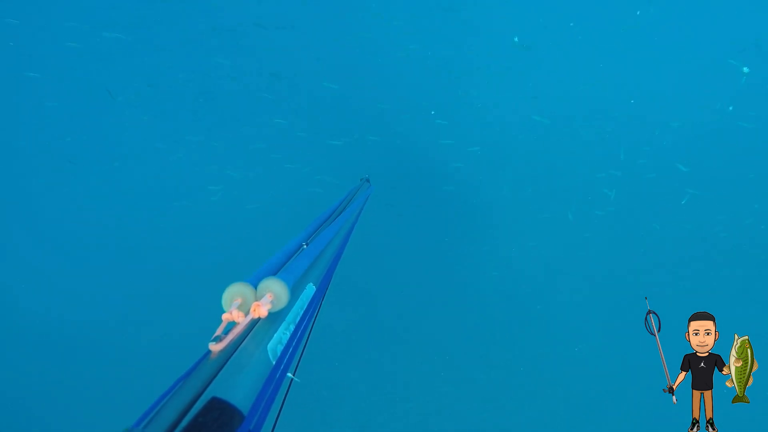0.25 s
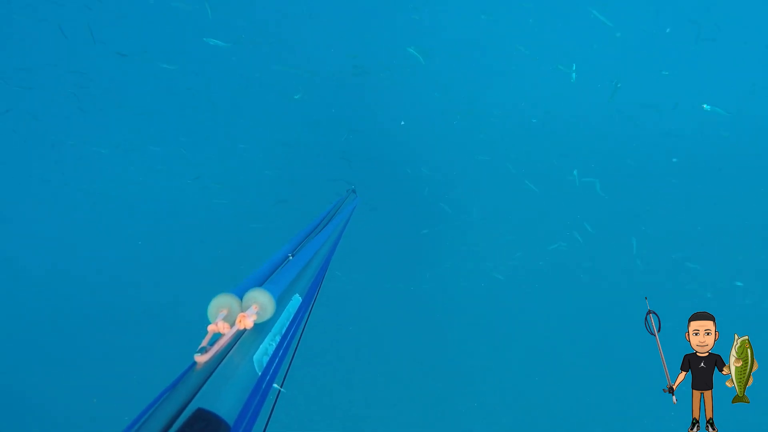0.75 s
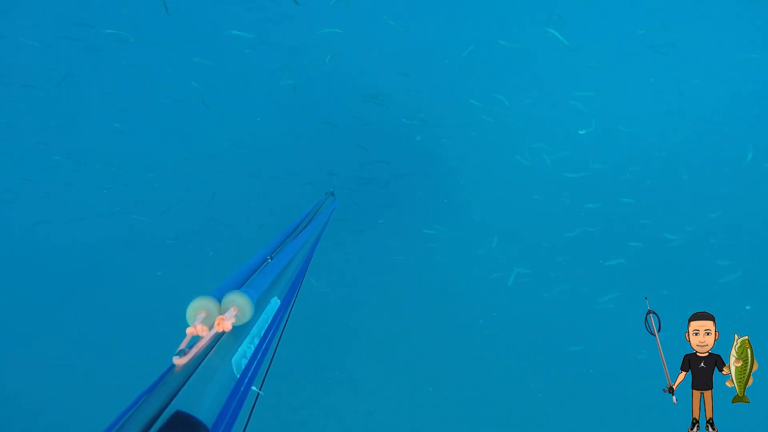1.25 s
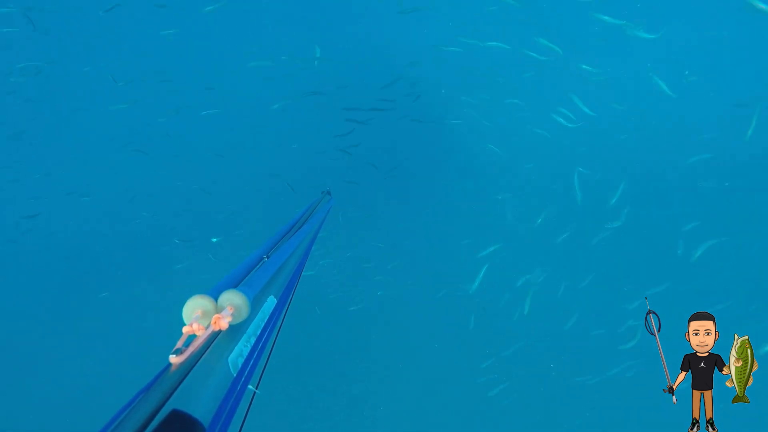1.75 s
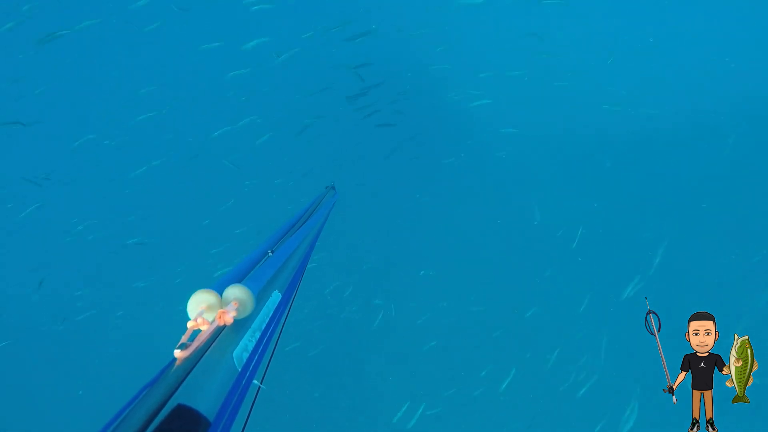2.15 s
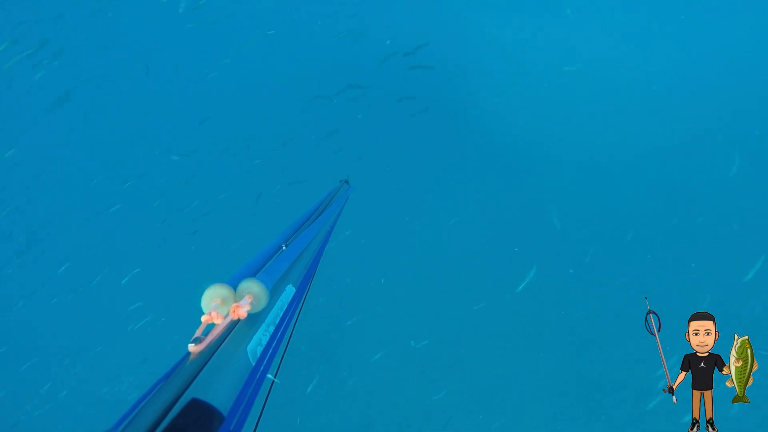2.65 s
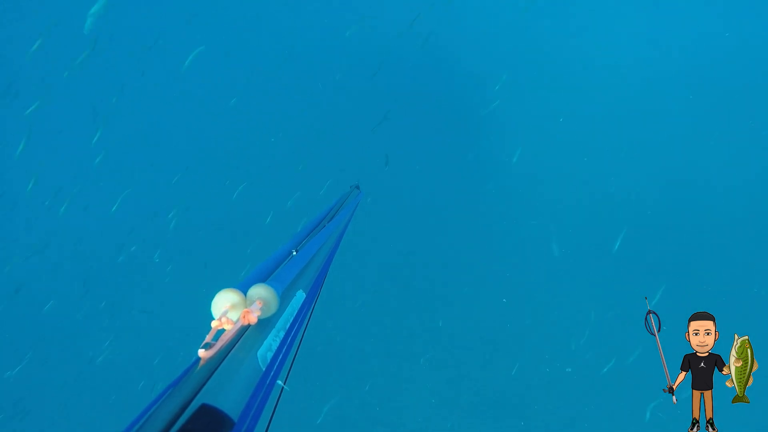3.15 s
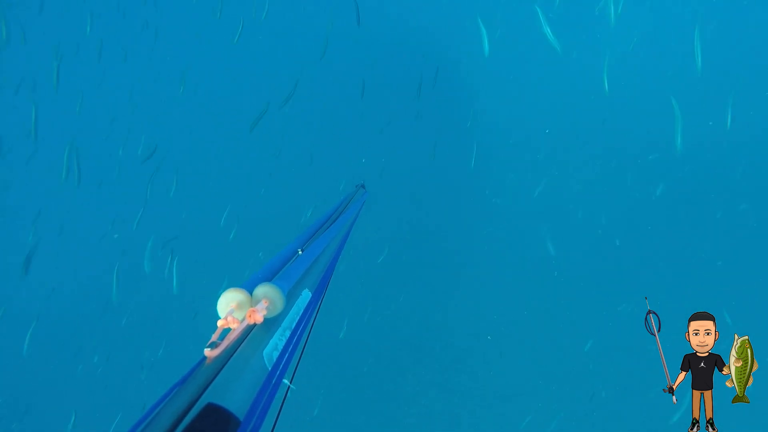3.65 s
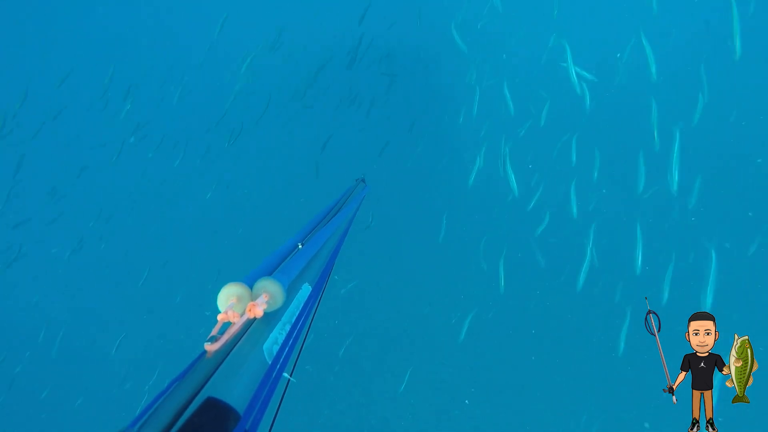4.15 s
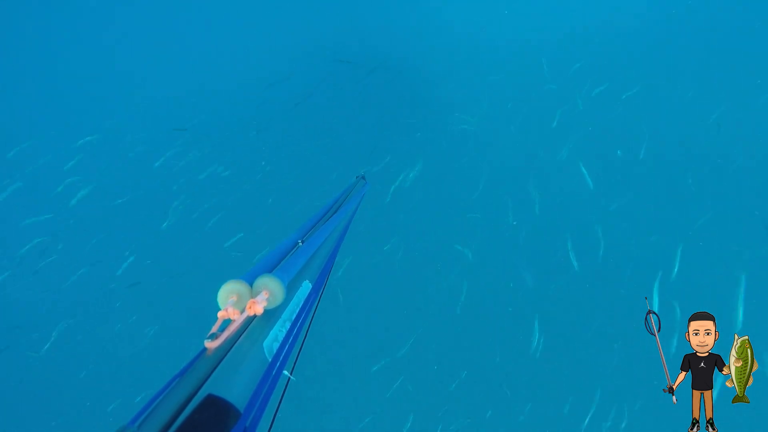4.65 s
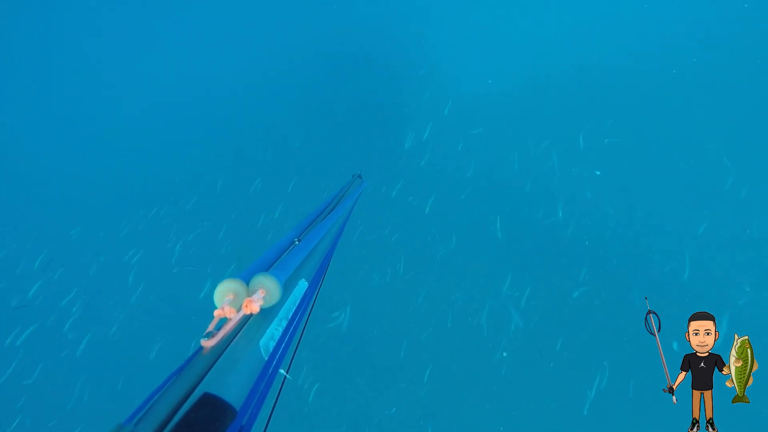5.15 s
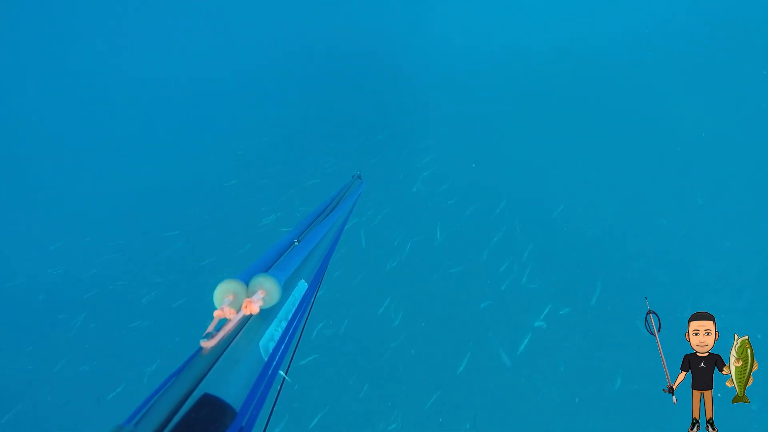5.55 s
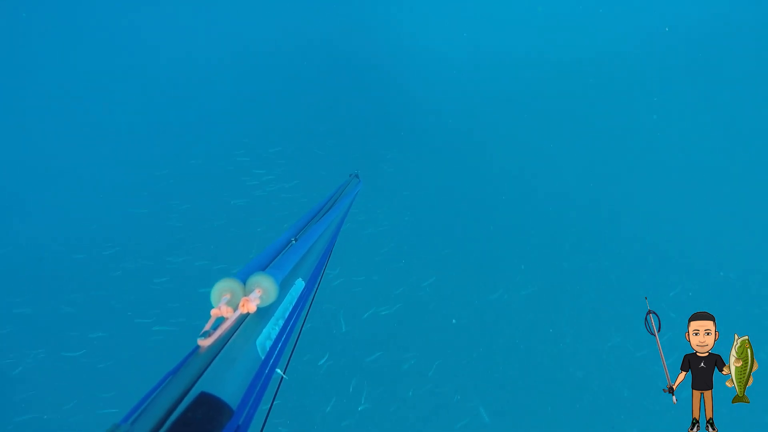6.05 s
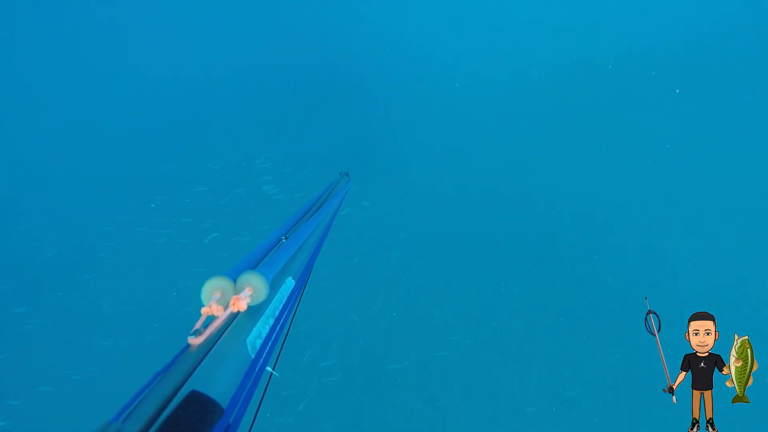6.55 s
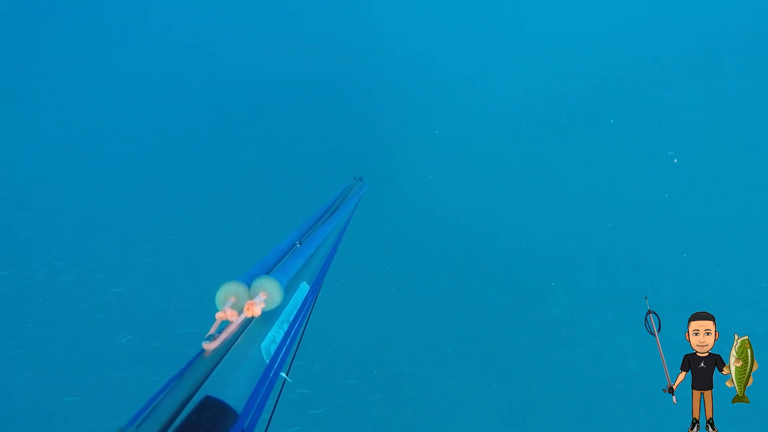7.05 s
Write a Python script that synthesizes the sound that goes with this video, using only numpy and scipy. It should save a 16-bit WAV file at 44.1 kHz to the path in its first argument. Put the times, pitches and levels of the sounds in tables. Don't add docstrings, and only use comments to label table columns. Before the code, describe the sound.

Underwater, a motorboat's low throbbing drone and metallic rattle grow steadily louder, with early housing knocks, faint shrimp clicks and bubbles at the end.

```python
import sys
import numpy as np
from scipy import signal
from scipy.fft import rfft, irfft
from scipy.io import wavfile
from scipy.ndimage import uniform_filter1d

SR = 44100
rng = np.random.default_rng(int(sys.argv[2]) if len(sys.argv) > 2 else 0)


def invert_db(x):
    u = np.asarray(x, float) / 20
    return 10 ** u


def file_out(sig):
    cols = np.atleast_2d(sig).T
    lim = np.clip(cols, -1, 1)
    pcm = np.round(lim * 32767).astype(np.int16)
    wavfile.write(sys.argv[1], SR, pcm)


N = 321489


def curves(table):
    s, *columns = np.transpose(table)
    return [np.interp(np.arange(N) / SR, s, c) for c in columns]


def unit(x):
    return x / np.sqrt(np.mean(x ** 2))


def delayed(x, lag_ms):
    return np.interp(np.arange(N) - lag_ms * SR / 1000, np.arange(N), x)


def walk(rate_hz):
    hold = int(SR / rate_hz)
    steps = np.repeat(rng.standard_normal(N // hold + 1), hold)
    return 1.42 * uniform_filter1d(uniform_filter1d(steps, hold), hold)[:N]


def ring(x, hz, width_hz):
    decay = np.exp(-np.pi * width_hz / SR)
    return signal.lfilter([1 - decay], [1, -decay * np.exp(2j * np.pi * hz / SR)], x)


# t/s, heading/-1..1
HOUSING_HEADING = [(0, .6), (.3, 1), (.8, .9), (1.2, 0.2), (1.7, 0.068), (2.2, 0.18), (2.9, -.3),
                   (3.4, -0.28), (3.9, 0.74), (4.3, .8), (4.8, .7), (5.2, -0.1), (5.6, -0.49), (6.1, -0.22),
                   (6.5, -0.49), (6.9, -.1), (7.29, .2)]


def housing(x, panels, facing_db=None):
    out = np.zeros((2, N))
    for k, (hz, width_hz, left_db, right_db, lead_rad) in enumerate(panels):
        z = ring(ring(x, hz, 1.6 * width_hz), hz, 1.6 * width_hz)
        if facing_db is not None:
            z = z * invert_db(facing_db[k] * curves(HOUSING_HEADING)[0])
        out += [invert_db(left_db) * z.real, invert_db(right_db) * (z * np.exp(1j * lead_rad)).real]
    return out


def churn(centres_hz, width_hz):
    z = rng.standard_normal(N)
    for hz in centres_hz:
        z = ring(z, hz, width_hz)
    return unit(z.real)


# t/s, rate/Hz
ENGINE_CYCLE = [(0.0, 14.761), (0.5, 13.363), (0.9, 13.91), (1.4, 13.725), (1.9, 13.111), (2.3, 13.277),
                (2.65, 13.059), (3.05, 14.021), (3.4, 13.379), (3.8, 13.567), (4.3, 12.556), (4.8, 12.174),
                (5.15, 11.528), (5.45, 12.947), (5.75, 13.533), (6.05, 13.533), (6.5, 13.754),
                (7.29, 14.278)]
# t/s, exhaust level/dB, hull rattle level/dB
BOAT_LEVELS = [(0.0, -34.5, -44), (0.38, -35.5, -41.5), (0.43, -39.5, -44), (0.45, -36, -44),
               (0.79, -41, -43), (0.91, -32.5, -43), (1.7, -35.5, -38.5), (1.76, -33, -38),
               (3.39, -27, -41.5), (4.1, -28.5, -44.5), (4.85, -24.5, -44), (4.95, -28, -44),
               (5.14, -22.5, -44.5), (5.2, -25, -43), (5.79, -20, -38), (6.21, -27.5, -38),
               (6.42, -25, -36.5), (7.29, -23, -40.5)]
# multiple, level/dB
MAIN_MULTIPLES = [(7, -3), (8, -3), (9, -2.5), (10, -4)]
# multiple, level re boom/dB, unsteadiness/dB
LOW_MULTIPLES = [(5, -20, 2), (6, -19, 2)]
# multiple, level re overtones/dB, unsteadiness/dB
HIGH_MULTIPLES = [(11, -10.5, 3), (12, -1, 1.5), (13, -10, 3), (14, -15, 3), (15, -22, 3), (16, -16, 2)]
# t/s, note/Hz
EXHAUST_NOTE_HZ = [(0, 107), (1.4, 110), (2.3, 109), (2.8, 115), (3.3, 112), (3.9, 104.3), (4.5, 105.8),
                   (4.8, 100), (5.1, 107.6), (5.27, 120), (5.45, 100.5), (5.62, 106.3), (5.8, 119.6),
                   (6.0, 107), (6.22, 118.5), (6.4, 111), (6.9, 111), (7.29, 112)]
# t/s, throb position/cycles, overtone level/dB, evenness/0..1
EXHAUST_FLOW = [(0, -0.2, -1.5, .2), (1.3, -.15, -3.5, 0.12), (1.5, -0.4, 1, 0.2), (2.1, -0.9, -1, 0.22),
                (2.5, -0.76, -1.5, .05), (3.7, -1.43, 2, .05), (4.1, -1.55, 1.8, 0.66),
                (4.7, -1.7, -2.5, .7), (5.1, -2, 1, .7), (5.3, -1.4, -0.5, 0.5), (5.7, -1.16, -2, .8),
                (6.1, -1.4, 0.5, 0.3), (6.5, -1.27, 0, 0.1), (6.7, -1.2, 1, .05), (6.9, -1.87, 0, .05),
                (7.1, -2, -3, 0.4), (7.29, -2.5, 1, 0.1)]


def boom(turns):
    width_hz, beating_db, upper_re_boom_db, left_lag_ms = 32.5, 3.5, -14, 0.24
    body_db, rate_hz = curves(BOAT_LEVELS)[0], curves(ENGINE_CYCLE)[0]
    throb, open_db, steady = curves(EXHAUST_FLOW)
    upper_db = body_db + upper_re_boom_db + open_db
    note_hz = curves(EXHAUST_NOTE_HZ)[0]

    share_db = []
    for k, db in MAIN_MULTIPLES:
        off_note = 2 * (k * rate_hz - note_hz) / (width_hz * (1 - 0.49 * steady))
        share_db.append(db - 20 * np.log10(1 + off_note ** 2) + beating_db * walk(5))
    total_db = 10 * np.log10(sum(invert_db(2 * db) for db in share_db))
    levels = [(k, body_db + db - total_db) for (k, _), db in zip(MAIN_MULTIPLES, share_db)]
    levels += [(k, body_db + db + loose_db * walk(3.1)) for k, db, loose_db in LOW_MULTIPLES]
    levels += [(k, upper_db + db + loose_db * walk(3.8)) for k, db, loose_db in HIGH_MULTIPLES]

    out = invert_db(body_db - 11.0) * churn((111.3, 111.3, 111.3), 49)
    out += invert_db(upper_db - 7.0) * churn((170, 170, 158), 120)
    drift = 0.65 * walk(2.304)
    for k, db in levels:
        phase = 0.27 * walk(2.3) + 0.36 * walk(11) + drift
        phase += 2 * np.pi * throb * ((k + 2) % 4 - 2)
        phase += steady * np.pi / 2 * (k % 2)
        level = np.sqrt(2) * invert_db(db + 0.87 * walk(12))
        out = out + level * np.sin(2 * np.pi * k * turns + phase)
    return np.array([delayed(out, left_lag_ms), out]) * invert_db(np.array([[-.45], [.45]]))


# t/s, cylinder 1 level/dB, 2 level/dB, 3 level/dB, 4 level/dB
CYLINDER_LEVELS = [(0, -4, -6, -5, -6), (.7, -3, -6, -3, -6), (1.1, 0, -6, -1, -4), (1.7, 0, -5, 1, -5),
                   (2.15, -0.5, -4, 1.5, -8), (2.4, 2, -2.5, 0, -9), (3.0, 1, -2, 0, -7),
                   (3.5, 2, -2, -1, -7), (4.0, 0, -5, -1, -6), (4.5, 0, -3, -1, -6), (5.0, -2, -6, -2, -4),
                   (5.6, -2, -5, -2, -3.5), (6.0, 0.5, -9, 0.5, -3.5), (6.4, 2, -9, 0, -3),
                   (6.75, 0.5, -7, 1, -4), (7.0, 2, -4, -2, -3), (7.29, 0, -6, 1, -4)]


def firings(turns):
    first_firing_turns, decay_s = .425, .0115
    count = (4 * (turns - first_firing_turns) + 4).astype(int)
    fired = np.diff(count, prepend=count[0] - 1)
    since = np.arange(N) - np.flatnonzero(fired)[count - count[0]]
    moods_db = np.array([db + .8 * walk(4) for db in curves(CYLINDER_LEVELS)])
    mood_db = moods_db[count % 4, np.arange(N) - since]
    size = invert_db(.85 * mood_db + 1.3 * rng.standard_normal(N // 100)[count])
    patterns = rng.standard_normal((4, 4, SR // 10))[:, count % 4, since]
    blend = np.array([walk(1.5) for _ in range(4)])
    repeating = np.sum(patterns * blend, axis=0) / np.sqrt(np.sum(blend ** 2, axis=0))
    clatter = .85 * repeating + .5 * rng.standard_normal(N)
    return size * (2.4 * fired + np.exp(-since / (decay_s * SR)) * clatter), count


# t/s, near (surface) lag/ms, far (sea-bed) lag/ms
ECHO_LAGS = [(0, 0.48, 1.26), (1.0, 0.21, 1.53), (1.4, 0.35, 1.73), (1.8, 0.29, 1.79), (2.3, 0.3, 1.78),
             (2.9, 0.3, 1.61), (3.4, 0.35, 1.99), (3.9, 0.66, 2.28), (4.4, 0.54, 1.9), (4.8, 0.55, 2),
             (5.1, 0.38, 1.48), (5.4, 0.52, 1.1), (5.8, 0.33, 1.034), (6.3, 0.26, 1.054),
             (6.7, 0.23, 0.702), (7.03, 0.34, 0.64), (7.15, 0.56, 0.654), (7.29, 0.3, 0.54)]


def surface_and_bed_echoes(burst, wash):
    near_ms, far_ms = curves(ECHO_LAGS)
    for lag_ms, share in ((near_ms, 0.16), (far_ms, 0.36 / far_ms)):
        rippled_ms = lag_ms * (1 + 0.05 * walk(2.6))
        burst = burst - share * delayed(burst, rippled_ms)
        wash = wash - share * delayed(wash, rippled_ms)
    return burst, wash


# f/Hz, width/Hz, left level/dB, right level/dB, right lead/rad
BROADSIDE_PANEL = [(1950, 42, -7, .3, -2.1)]


def singing(burst, wash):
    centre_s, half_s, level_db = 6.77, .33, -7.5
    broadside = np.exp(-((np.arange(N) / SR - centre_s) / half_s) ** 4)
    return invert_db(level_db) * broadside * unit(housing(burst + .3 * wash, BROADSIDE_PANEL))


# f/Hz, width/Hz, left level/dB, right level/dB, right lead/rad
HULL_PANELS = [
    [(487, 47, -17.5, -0.5, 1.48), (540, 126, -7, -3.5, 1.5), (695, 39, -7, -2.5, 2.88),
     (753, 147, -4.5, 5.5, 2.84), (904, 42, -13, -11.5, 3.2), (1035, 95, -12, -14, 2.47)],
    [(1200, 38, -2.5, -25, 1.5), (1321, 107, 7.5, 1.5, -2.5), (1393, 76, 4, -5.5, -2.5),
     (1481, 81, 4.5, 1.5, -2), (1664, 81, -31, -2, -0.5)],
    [(1797, 38, -40, -1.5, -2.5), (1853, 84, -9.5, -6, -1.5), (1923, 50, -7, 0, -2)],
    [(2245, 30, 5.5, 5.5, -3), (2550, 96, 4.5, -7.5, 1.5), (2370, 81, -9, -7, -2.5),
     (2757, 101, 3.5, 4.5, -1), (3093, 220, -3, -6.5, 0.24), (5560, 340, -34, -15.5, 1.5)],
]
PANEL_FACING_DB = [
    [-1.5, -1.5, 1.6, 0.23, .7, -1.5],
    [-5, -3, -4, 0.5, 0],
    [0.2, -1.5, -2],
    [0, .7, 3, 3, 2, 2],
]
REGISTER_LEVELS_DB = [-5.5, -4.5, -5.5, -13]
WASH_SHARES = [.4, .22, .18, .28]
# t/s, lag/ms, level/dB, cylinder 3 up and 1 down/dB
SEA_BED_PATH = [(0, 0.52, -2, 1.5), (.7, 1.03, 0, -2), (1.4, 4.14, -1, -4), (2.1, 7, -0.5, 0.5),
                (2.6, 3.55, -3, 2), (3.6, 5.3, 0, 2.5), (4.4, 4.8, 1, 2), (4.8, 2.9, -1, 1),
                (5.2, 0.78, 1.5, 0.5), (5.6, 0.69, -5.5, 0.5), (6.0, 0.53, -2, -3), (6.6, 0.61, -1.5, -3),
                (7.0, 0.45, 2.5, 1), (7.29, 0.6, 7.5, -1.5)]


def rattle(turns):
    burst, count = firings(turns)
    wash = invert_db(2 * walk(9)) * rng.standard_normal(N)
    burst, wash = surface_and_bed_echoes(burst, wash)
    lag_ms, gain_db, lean_db = curves(SEA_BED_PATH)
    leaning = burst * invert_db(lean_db * np.array([-1, 0, 1, 0])[count % 4])
    sources = (leaning, burst, burst, burst)
    registers = []
    for db, panels, share, facing_db, source in zip(
            REGISTER_LEVELS_DB, HULL_PANELS, WASH_SHARES, PANEL_FACING_DB, sources):
        registers.append(invert_db(db) * unit(housing(source + share * wash, panels, facing_db)))
    low, *upper = registers
    low = np.array([delayed(x, lag_ms) for x in low])
    hull = invert_db(gain_db) * low + sum(upper) + singing(burst, wash)
    return invert_db(curves(BOAT_LEVELS)[1] + 5) * hull


# t/s, peak level/dB, ring f/Hz, 60 dB decay/s, crack level/dB
KNOCKS = [(.31, -40, 510, .035, -20), (.339, -20, 520, .022, -30), (.34, -10.5, 305, .026, -11),
          (.4138, -3.5, 427, .014, -21), (.418, -30, 431, .074, -30), (.733, -29, 298, .03, -.5),
          (1.052, -19, 63, .13, -27), (1.068, -10, 174, .04, -20), (1.42, -37.5, 474, .066, -30),
          (1.98, -39, 300, .053, -20), (3.074, -29, 930, .05, -20), (3.418, -7.5, 139.4, .053, -25),
          (3.422, -19.5, 450, .017, -18), (3.424, -20, 205, .05, -25), (3.479, -32, 304, .068, -15),
          (3.611, -32, 299, .11, -15), (3.621, -27.5, 2940, .014, -30), (3.972, -32.5, 297, .052, 7),
          (4.03, -37, 310, .05, -20), (4.592, -41, 442, .068, -20), (4.592, -29, 716, .071, -15),
          (4.84, -40, 334, .053, -20), (4.87, -38, 690, .05, -20), (4.965, -35, 680, .07, -20),
          (5.04, -37, 265, .05, -20), (5.575, -38, 1000, .04, -20), (5.581, -31.5, 380, .025, -.5),
          (5.765, -36, 510, .04, -20), (5.98, -35, 270, .04, -15), (6.52, -37, 350, .04, -20),
          (6.695, -27, 294, .16, -16), (6.713, -15, 180, .069, -23), (6.733, -32, 328, .063, -13),
          (6.789, -30, 300, .05, -11), (6.836, -21, 524, .029, -10), (6.876, -32, 283, .075, -2),
          (7.131, -30, 318, .1, -7)]


def knocks():
    out = np.zeros((2, N + SR))
    age = np.arange(SR // 5) / SR
    crack_s, crack_hz = 0.0015, 740
    for s, db, hz, t60_s, crack_db in KNOCKS:
        cycles = hz * age
        rise = 1 - np.exp(-(cycles / 1.28) ** 2)
        settling = cycles + 0.38 * (1 - np.exp(-cycles / 0.3))
        tone = rise * np.exp(-np.log(1000) * age / t60_s + 2j * np.pi * settling)
        crack = invert_db(crack_db) * age / crack_s * np.exp(-age / crack_s + 2j * np.pi * crack_hz * age)
        lead_rad = np.clip(hz / 130 - 2.7, -.5 * (hz > 250), 2.5) * (hz < 2000)
        right = tone * np.exp(1j * lead_rad) + crack * np.exp(2.2j)
        pan_db = -6 if hz > 350 else 1.5
        i = int(s * SR)
        gains = 2 * invert_db(db + pan_db * np.array([[.5], [-.5]]))
        out[:, i:i + len(age)] += gains * np.imag([tone + crack, right])
    return out[:, :N]


# t/s, peak level/dB, length/s, direction/+-1
HOUSING_PUSHES = [
    (0.351, -16, .016, -1),
    (0.312, -28, 0.025, 1),
    (0.391, -22.5, 0.023, 1),
    (.4155, -16.5, 0.0063, -1),
    (0.43, -19, .013, 1),
    (0.446, -26, 0.019, -1),
]


def pushes():
    out = np.zeros((2, N + SR))
    age = np.arange(SR // 5) / SR
    for s, db, length_s, direction in HOUSING_PUSHES:
        push = np.sin(np.pi * np.clip(age / length_s, 0, 1)) ** 0.97
        i = int(s * SR)
        out[:, i:i + len(age)] += np.sign(direction) * invert_db(db) * push
    return out[:, :N]


# t/s, peak level/dB, half length/s
WATER_SHOVES = [(0.134, -33, 0.066), (0.384, -26, 0.076), (0.56, -31, 0.14), (1.17, -30.5, 0.038),
                (3.331, -35, 0.053), (3.456, -21.5, 0.018), (6.006, -27, 0.02), (6.2, -31, 0.09),
                (6.4, -33, 0.07), (6.62, -26, 0.1), (7.29, -30, 0.053)]


def surge():
    band = signal.butter(2, [19, 38], "band", fs=SR, output="sos")
    mid, side = signal.sosfilt(band, rng.standard_normal((2, N)))
    mid = mid / np.sqrt(uniform_filter1d(mid ** 2, size=SR // 8))
    t = np.arange(N) / SR
    shoves = sum(invert_db(db) * np.exp(-((t - s) / half_s) ** 2) for s, db, half_s in WATER_SHOVES)
    swell = np.hypot(invert_db(-37.5 + walk(15)), shoves)
    return swell * (mid + .06 * unit(side) * np.array([[1], [-1]]))


def wake():
    from_s, bubbles, peak_db = 5.9, 260, -33
    low_hz, octaves, decay_cycles, glide = 450, 1.256, 8.2, 0.0206
    out = np.zeros(N + SR, complex)
    age = np.arange(SR // 20) / SR
    for when, pitch, size in rng.random((bubbles, 3)):
        cycles = low_hz * 2 ** (octaves * pitch) * age
        i = int(N - (N - from_s * SR) * (1 - np.sqrt(when)))
        shape = (1 - np.exp(-cycles)) * np.exp(-3 * cycles / decay_cycles)
        chirp = np.exp(2j * np.pi * cycles * (1 + glide * cycles))
        out[i:i + len(age)] += invert_db(peak_db + 10 * size) * shape * chirp
    return np.imag([invert_db(-6) * out[:N], out[:N] * np.exp(2.4j)])


# t/s, peak level/dB, brightness/dB
SHRIMP_SNAPS = [(0.0581, -41.5, -4), (0.1493, -26.5, -19), (0.854, -47, -1), (1.357, -41, -11),
                (1.7856, -42, -26), (1.9194, -24.5, -25), (2.037, -49, -14), (2.089, -34, -12),
                (2.255, -37.5, -6.5), (2.588, -49, 1.5), (2.624, -34.5, -25), (3.062, -38, -18),
                (3.556, -43.5, -6), (3.8237, -41.5, -8), (3.908, -39.5, -9), (4.241, -33, -14.5),
                (4.52, -44, -7), (4.842, -31.5, -12.5), (4.9205, -34, -20), (5.1235, -39.5, -13),
                (5.46, -47, -5), (5.498, -38, -27), (5.8656, -39.5, -6.5), (6.0402, -39.5, -13),
                (6.098, -31.5, -15.5), (6.166, -30, -16), (6.418, -33, -14), (6.464, -32, -21),
                (6.8216, -38, -11), (7.189, -37.5, -9), (0.2573, -43, -16), (0.3506, -52, -15),
                (0.38, -50, -8), (0.597, -53, -7), (0.9253, -53, -10), (1.04, -44, -14), (1.1015, -49, -11),
                (1.1937, -45, -5), (1.2241, -51, -6), (1.3224, -47, -7), (1.5149, -46, -10),
                (1.7399, -48, -19), (2.3351, -45, -8), (2.3526, -46, -8), (2.4718, -50, -7),
                (2.7509, -56, -8), (3.3643, -54, -12), (4.0118, -47, -9), (4.0277, -44, -5),
                (4.126, -47, -8), (4.3316, -48, -8), (4.5825, -50, -9), (4.7082, -45, -7),
                (4.7676, -48, -6), (5.2594, -47, -18), (5.3592, -47, -8), (5.7867, -43, -9),
                (5.8321, -49, -3), (6.3375, -38, -14), (6.549, -41.5, -11)]
# f/Hz, width/Hz, left level/dB, right level/dB, right lead/rad
SHRIMP_PANELS = [(3230, 2770, -7.5, -1.5, -1), (4940, 630, -9, -4, 3.5), (5503, 560, -26, 4.5, -2.5),
                 (7460, 760, 2, 3, 1), (8780, 870, -4, 1.5, 1.8)]


def shrimp():
    snap_top_hz, fizz_top_hz, tail_s = 9540, 12050, 0.011
    s, db, bright_db = np.transpose(SHRIMP_SNAPS)
    dull, bright, crackle = np.zeros((3, N))
    dull[(s * SR).astype(int)] = invert_db(db)
    bright[(s * SR).astype(int)] = invert_db(db + bright_db + 14.5)
    when, rarity = rng.random((1500, 2)).T
    crackle[(when * (N - 1)).astype(int)] = invert_db(-57.0 + np.minimum(-3.5 * np.log(rarity), 10.5))
    fade = np.exp(-1 / (tail_s * SR))
    scatter = 0.053 * rng.standard_normal(N)
    dull, bright = (x + scatter * signal.lfilter([1], [1, -fade], x)
                    for x in (dull + crackle, bright + crackle))
    panels = housing(dull, SHRIMP_PANELS[:3]) + housing(bright, SHRIMP_PANELS[3:])
    fizz = uniform_filter1d(abs(bright), size=40) * rng.standard_normal((2, N))
    low = signal.butter(4, snap_top_hz, "low", fs=SR, output="sos")
    high = signal.butter(4, [snap_top_hz, fizz_top_hz], "band", fs=SR, output="sos")
    return invert_db(23.5) * signal.sosfilt(low, panels) + invert_db(1) * signal.sosfilt(high, fizz)


# f/Hz, width/Hz, left level/dB, right level/dB, right lead/rad
SHELL_MODE = [(292.5, 61, 0.0066, -0.08, 0.0059)]


def shell_murmur():
    mid = housing(rng.standard_normal(N), SHELL_MODE)
    side = housing(rng.standard_normal(N), SHELL_MODE) * [[1], [-1]]
    return invert_db(-54.5 + 2.6 * walk(9.5)) * unit(mid + 0.39 * side)


# f/Hz, density level/dB
HISS_SPECTRUM = [(35, -48), (60, -4), (120, -8.5), (240, -27.5), (400, -34.5), (1000, -33.5), (2500, -31.5),
                 (3800, -46.5), (4600, -51.5), (5400, -47), (6400, -48.5), (7600, -47), (10000, -51.5),
                 (12500, -63.5), (14100, -65.5)]


def hiss():
    hz = np.maximum(np.arange(N // 2 + 1) * SR / N, 1)
    point_hz, point_db = np.transpose(HISS_SPECTRUM)
    colour = invert_db(np.interp(np.log(hz), np.log(point_hz), point_db))
    mid, side = rfft(rng.standard_normal((2, N))) * colour
    side = side * np.clip((hz / 330) ** 2, .08, 1)
    return invert_db(-40 + walk(13)) * unit(irfft(np.array([mid + side, mid - side]), N))


def scene():
    turns = np.cumsum(curves(ENGINE_CYCLE)[0]) / SR
    engine = boom(turns) + rattle(turns)
    handling = knocks() + pushes()
    water = surge() + wake()
    return engine + handling + water + shrimp() + shell_murmur() + hiss()


def top_cut(x):
    return signal.sosfilt(signal.butter(12, 14280, fs=SR, output="sos"), x)


def record(dry):
    return top_cut(dry)


dry = scene()
out = record(dry)
file_out(out)
```